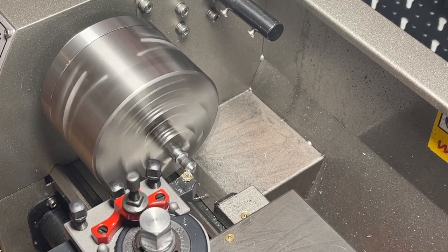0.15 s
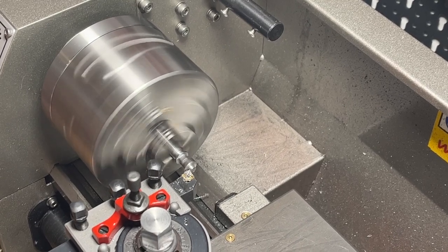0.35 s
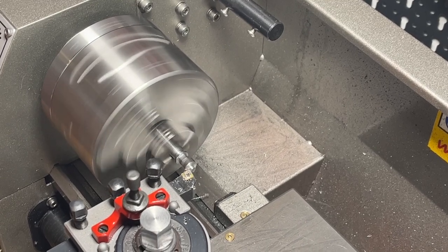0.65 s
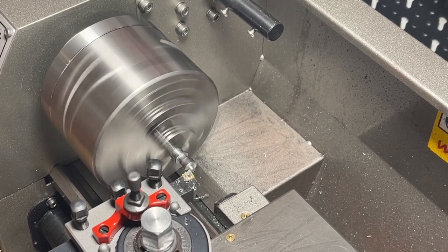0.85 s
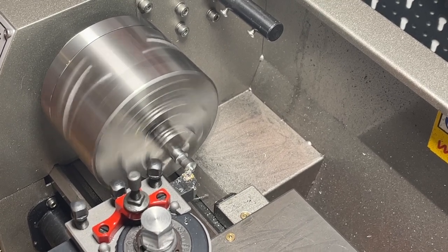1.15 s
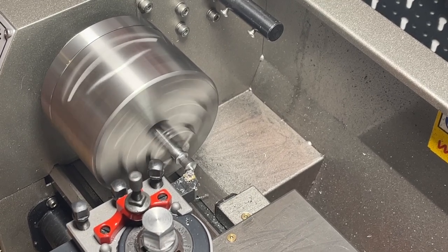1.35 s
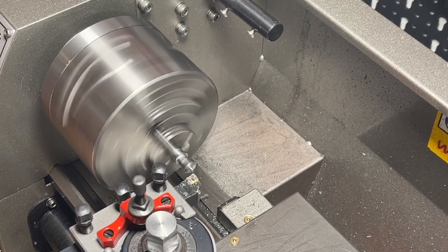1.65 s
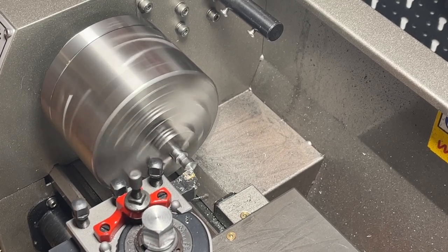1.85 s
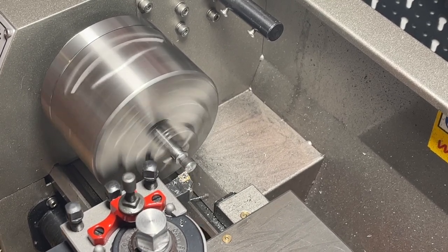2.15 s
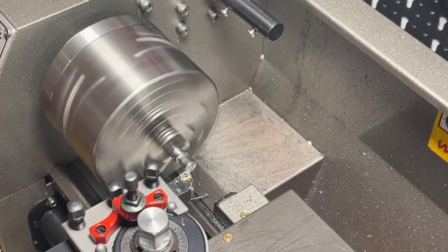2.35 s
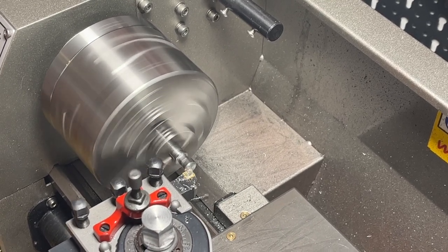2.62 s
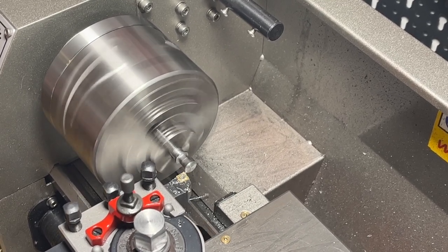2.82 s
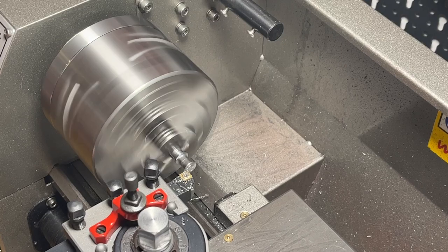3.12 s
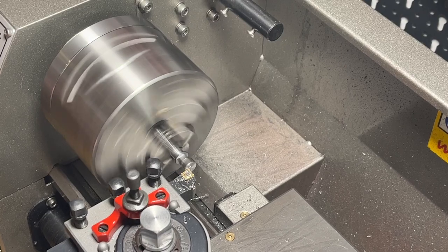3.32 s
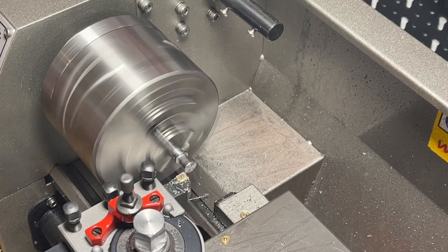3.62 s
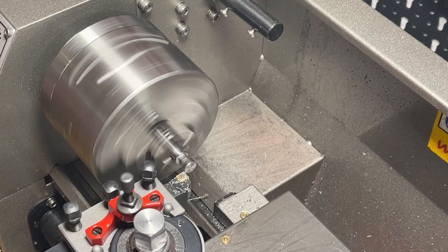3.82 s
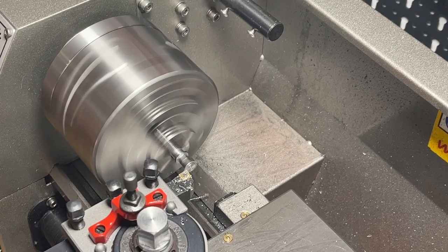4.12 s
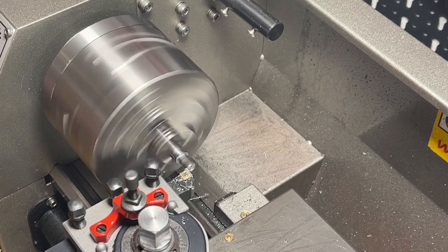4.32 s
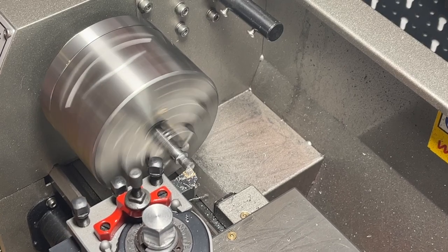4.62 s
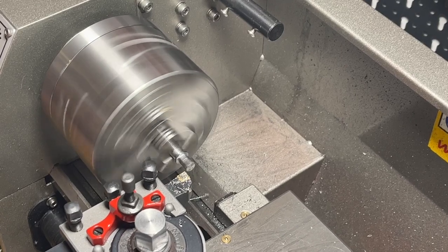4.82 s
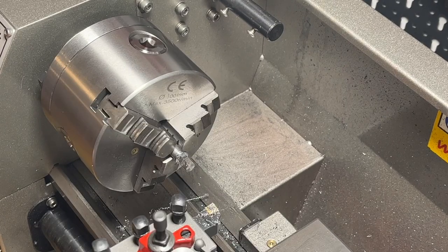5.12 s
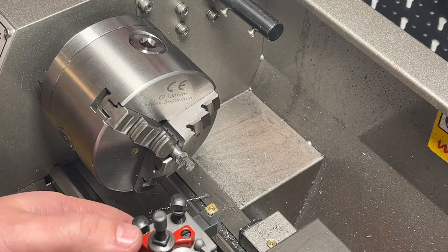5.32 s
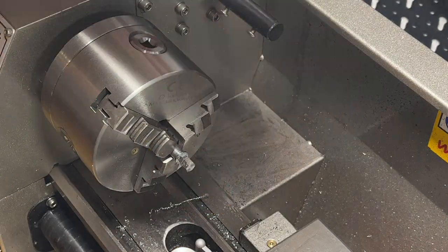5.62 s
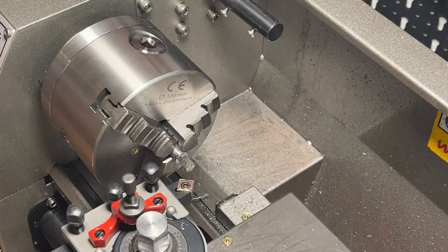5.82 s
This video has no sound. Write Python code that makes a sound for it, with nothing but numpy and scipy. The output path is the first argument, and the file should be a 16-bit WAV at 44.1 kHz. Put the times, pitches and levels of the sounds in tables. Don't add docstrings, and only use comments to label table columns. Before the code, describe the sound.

A small metal lathe whirs steadily with rattling gears and ticking joins, stops abruptly near five seconds, then quiet bumps, rubs and one sharp knock.

```python
import sys
import numpy as np
from scipy import signal
from scipy.fft import rfft, irfft, next_fast_len
from scipy.io import wavfile
from scipy.ndimage import uniform_filter1d, map_coordinates

SR = 44100
rng = np.random.default_rng(int(sys.argv[2]) if len(sys.argv) > 2 else 0)


def voltage_ratio(level):
    return 10 ** (np.asarray(level, float) / 20)


def transcribe(u):
    v = np.clip(np.atleast_2d(u).T, -1, 1)
    q = np.round(v * 32767).astype(np.int16)
    wavfile.write(sys.argv[1], SR, q)


N = 262836

# freq_hz, density_db (per Hz)
RUSH_COLOUR = [(500, -62), (730, -23), (1100, -18.5), (1400, -7), (1600, -13.5), (2000, -9), (2600, -19.5),
               (4040, -28), (5660, -30), (7400, -41.5), (8350, -54), (9600, -41.5), (14300, -56.5),
               (15500, -74)]
# freq_hz, density_db (per Hz)
BENCH_COLOUR = [(12, -55.5), (32, -11.5), (45, -7), (65, -12), (90, -5), (156, 0), (220, -7), (290, -43.5),
                (480, -120)]
# freq_hz, density_db (per Hz)
HOUSING_COLOUR = [(120, -23), (200, -25), (248, -2), (361, -0.5), (393, -3), (433, 0.5), (471, -4),
                  (720, -18), (940, -54), (1580, -120)]
# centre_hz, width_hz, level_db
CASTING_MODES = [(984, 83, -14), (1262, 34, -9), (1307.4, 36.4, -0.5), (1428, 27, -17.5), (1474.3, 43, -3),
                 (1684, 40, -9), (1781, 23, -5), (2024, 150, -14), (2190, 37, -4.5), (2337, 100, -11.5),
                 (2535, 31, -17), (3100, 47, -15.5), (3296, 127, -16), (3730, 37, -20), (4797, 330, -26),
                 (5516, 250, -24.5), (6090, 140, -26)]
# time_s, pitch_hz, level_db (rms)
BRAKE_HUM = [
    (4.955, 418.4, -73),
    (4.975, 387, -31),
    (5.0, 373, -42),
    (5.008, 311, -33),
    (5.032, 310, -45),
    (5.04, 380, -49.5),
    (5.07, 368, -45),
    (5.082, 362, -75),
]
# time_s, pitch_hz, level_db (rms)
STEEL_RING = [
    (5.624, 5100, -95),
    (5.635, 5080, -82),
    (5.665, 5060, -89),
    (5.7, 5050, -90),
]
# time_s, pitch_hz, level_db (rms)
PALM_PUSH = [
    (5.575, 120, -70),
    (5.587, 106, -52),
    (5.594, 97, -41),
    (5.599, 90, -38),
    (5.6, 90, -84),
]
# pitch_hz, level_db (rms), slip_rad (phase
STEADY_TONES = [(2744, -48.5, 1.8), (1312, -48, 1.6), (171, -54, 1.0), (251, -54, 1.5), (440, -52.5, 1.6)]
# pitch_hz, level_db (rms), slip_rad
DRIVE_WHINE = [(7698, -74, 1.4), (8027, -88, 1.2), (8613, -88, .8), (8780, -77, .35), (8952, -75.5, .6),
               (9120, -76, .8), (9265, -73.5, 1.0), (9288, -78, .8), (9437, -77, .9), (9528, -73.5, 1.1),
               (9690, -69, 1.5), (10026, -68, 1.5)]
# pitch_hz, level_db (rms), slip_rad
IDLE_WHINE = [(10026, -110, .3)]
# start_s, thud_db, thud_hz, rub_db
HANDLING = [(5.035, -44, 287, -56), (5.047, -55, 325, -63.5), (5.08, -76, 66, -91), (5.18, -60.5, 104, -84),
            (5.215, -76, 300, -80), (5.251, -66, 199, -74), (5.275, -76, 92, -85),
            (5.322, -51.5, 263, -50.5), (5.359, -58, 197, -75), (5.395, -57, 109, -68),
            (5.419, -63, 128, -82), (5.443, -82, 203, -89), (5.455, -44, 125, -51), (5.491, -51, 121, -58),
            (5.506, -49, 218, -44.5), (5.514, -56, 112, -77), (5.539, -78, 234, -89),
            (5.567, -48.5, 111, -84), (5.601, -62, 179, -90), (5.623, -62, 87, -75), (5.66, -68, 180, -87),
            (5.697, -60, 401, -75), (5.721, -47, 352, -48), (5.75, -52, 209, -99), (5.76, -57, 144, -60.5),
            (5.794, -55, 51, -78), (5.817, -50, 104, -76), (5.828, -66, 147, -73.5),
            (5.865, -75.5, 260, -86), (5.925, -66, 120, -82.5)]
# freq_hz, density_db (per Hz)
DEEP_COLOUR = [(25, -27), (55, -4), (100, 2), (160, -8), (300, -30.5), (900, -56)]
# freq_hz, density_db (per Hz)
HOLLOW_COLOUR = [(90, -25), (200, 0.5), (370, -1), (650, -14.5), (1200, -26)]
# freq_hz, density_db (per Hz)
RUB_COLOUR = [(400, -24), (700, -2.5), (1150, -6), (1450, 1), (1750, -2.5), (2000, -4), (2650, -10),
              (3080, -5.5), (3400, -13), (4100, -11.5), (7000, -25), (8400, -49), (9500, -73.5)]
# freq_hz, density_db (per Hz)
HISS_COLOUR = [(1200, -26), (2500, -6.5), (6500, -11.5), (8400, -28), (9600, -12), (14500, -16),
               (15500, -43)]
# start_s, peak_db, cut_s (the editor cuts it off)
POST_KNOCK = (5.7352, -16.5, 5.7517)
# pitch_hz, level_db, t60_s
POST_MODES = [(381, -14.5, .2), (564, -14.5, 0.12), (924, -13, 0.093), (1294, -19, .1), (1920, 0.5, 0.029),
              (2820, -10, 0.04), (3470, 6.5, 0.015), (4400, -2.5, 0.018), (4500, -8.5, .04),
              (5330, -2, 0.02), (6850, -19, 0.063), (10300, -11.5, 0.031), (12140, -20.5, .02)]
# freq_hz, density_db (per Hz)
AIR_COLOUR = [(40, -12), (90, 0), (200, -14), (400, -13), (700, -14.5), (2000, -30), (6000, -53.5)]
# time_s, level_db
CUT_DEPTH = [(0, -67), (0.44, -69.5), (0.5, -56), (0.57, -74), (0.72, -62), (0.76, -65), (1.0, -66.5),
             (1.96, -66), (2.33, -66), (2.5, -68), (3.11, -62.5), (3.35, -67), (3.71, -66.5), (3.86, -60),
             (3.9, -77), (3.97, -63), (4.2, -61.5), (4.5, -66.5)]
# time_s, half_length_s, change_db
HAND_LEANS = [(0.05, 0.019, -9), (0.17, .07, 5.5), (0.28, 0.012, -16.5), (0.36, 0.18, 4.5),
              (0.7, 0.063, 6.5), (0.755, .025, -7), (0.9, 0.081, 5.5), (2.1, 0.058, 3), (2.46, 0.02, 6),
              (3.17, 0.13, 3), (3.33, .06, 2.5), (3.71, 0.069, -3.5), (4.15, 0.087, 8.5), (4.28, 0.027, 8),
              (4.86, 0.13, 2.5)]
# time_s, change_db
MESH_BEATS = [(0.0, -4), (0.08, -1), (0.15, -2), (0.23, 6), (0.29, -9.5), (0.33, 4), (0.87, -1),
              (0.92, 0.5), (0.98, -11), (1.19, -3), (1.25, -2), (1.35, -6), (0.7, 3), (1.71, -2),
              (2.05, 0.5), (2.1, 6), (2.29, -20), (3.04, -10), (3.14, 6), (3.26, -7), (3.69, -11),
              (4.17, -8), (4.3, 1), (4.37, -11), (4.53, -10), (4.62, -3), (4.67, 3), (4.81, -7), (4.86, -1),
              (4.9, -5)]
# time_s, peak_db
RUNNING_JOINS = [(0.1419, -46), (0.166, -48), (0.3828, -45), (0.4791, -47), (0.5273, -47), (0.7556, -46),
                 (0.852, -48), (0.8885, -47), (0.9483, -46), (1.3105, -42), (1.6834, -47), (1.744, -46),
                 (1.9242, -46), (2.0572, -45), (2.3814, -48), (2.4666, -47), (2.5273, -45), (2.7644, -46),
                 (2.8404, -48), (2.8885, -47), (3.2142, -47), (3.8279, -47), (3.8644, -48), (3.9126, -46),
                 (4.009, -47), (4.0456, -45), (4.1178, -48), (4.2499, -45), (4.4675, -48), (4.9724, -47)]
# time_s, peak_db
HANDLING_JOINS = [(4.9858, -50), (5.0331, -69), (5.0456, -70), (5.0812, -82), (5.2142, -83), (5.3221, -76),
                  (5.4184, -82), (5.4907, -60), (5.5032, -64), (5.5387, -85), (5.5872, -90), (5.5995, -69),
                  (5.6237, -83), (5.6959, -84), (5.72, -68), (5.7797, -76), (5.7921, -82), (5.8163, -78),
                  (5.8279, -76)]
# start_s, end_s, level_db
SLEEVE_BRUSHES = [
    (5.226, 5.246, -69),
    (5.233, 5.24, -65),
    (5.249, 5.263, -66),
    (5.243, 5.276, -70),
    (5.272, 5.273, -65),
    (5.277, 5.32, -80),
    (5.828, 5.865, -80),
]
# freq_hz, density_db (per Hz)
SPRAY_COLOUR = [(9000, -27), (10500, 2.0), (12500, -7.5), (14300, -18), (15300, -47)]

BENCH_DB, HOUSING_DB, GEAR_DB, MESH_DB = -48.5, -40.5, -33.66, -39.5
HOUSING_SHARE, GEAR_SHARE = 0.46, 0.12
STOP_S, MACHINE_END_S, SPIN_DOWN_DB_PER_S = 4.97, 5.035, 168
LOW_SHARE, EDGE_SHARE = 0.71, 1.6
PAIR_S, LONG_AT_S, SHORT_AT_S = 0.024096, 0.009, 0.02127
CUT_SHARE, STEP_DB, STEP_TOP_DB = 0.5, -56, -50.5
HISS_DB, HISS_GROWS = -87, 0.58


def unit(x):
    return x / np.sqrt(np.mean(x ** 2) + 1e-20)


def along(points, hz):
    f, v = np.transpose(points)
    return np.interp(np.log(hz + 1), np.log(f + 1), v, left=-120, right=-120)


def wobble(rate_hz):
    return map_coordinates(rng.standard_normal(int(N * rate_hz / SR) + 4), [np.arange(N) * rate_hz / SR])


def coloured(x, gain):
    m = next_fast_len(N + 8192)
    return unit(irfft(rfft(x, m) * gain(np.fft.rfftfreq(m, 1 / SR)), m)[:N])


def noise(colour):
    return coloured(rng.standard_normal(N), lambda hz: voltage_ratio(along(colour, hz)))


def even(x):
    return unit(x / np.sqrt(np.abs(uniform_filter1d(x ** 2, size=1400)) + 0.36))


def bumps(rows):
    t = np.arange(N) / SR
    return sum(db * np.exp(-((t - s) / half) ** 2) for s, half, db in rows)


def glide(rows):
    s, hz, db = np.transpose(rows)
    t = np.arange(N) / SR
    phase = 2 * np.pi * np.cumsum(np.interp(t, s, hz)) / SR
    return np.sqrt(2) * voltage_ratio(np.interp(t, s, db, left=-150, right=-150)) * np.sin(phase)


def tones(lines, sway_db, rows):
    hz, db, slip = np.transpose(lines)[:, :, None]
    t = np.arange(N) / SR
    slips = rng.standard_normal((len(rows) + 1, len(lines))).T
    turned = np.exp(1j * slip * np.cumsum(slips, axis=1))
    piece = np.searchsorted(np.sort(rows[:, 0]), t)
    faded = uniform_filter1d(turned[:, piece], size=400, axis=1)
    sway = voltage_ratio(db + sway_db * np.array([wobble(20) for _ in lines]))
    waves = np.abs(faded) * np.cos(2 * np.pi * hz * t + np.angle(faded))
    return np.sqrt(2) * np.sum(sway * waves, axis=0)


def shop_air():
    return voltage_ratio(-74.5) * noise(AIR_COLOUR)


def editor_cuts():
    listed = np.array(RUNNING_JOINS + HANDLING_JOINS)
    s = (np.arange(0, 4.94, PAIR_S)[:, None] + [LONG_AT_S, SHORT_AT_S]).ravel()
    pick, step = rng.random(len(s)), np.abs(rng.standard_normal(len(s)))
    free = np.abs(s[:, None] - listed[:, 0]).min(axis=1) > 0.003
    db = np.minimum(STEP_DB + 20 * np.log10(step + 0.3), STEP_TOP_DB)
    return np.vstack([np.c_[s, db][free & (pick < CUT_SHARE)], listed])


def join_ticks(rows):
    s, db = np.transpose(rows)
    steps = np.zeros(N)
    steps[(s * SR).astype(int)] = voltage_ratio(db + 24) * np.sign(rng.standard_normal(len(s)))
    t = np.arange(-800, 801) / SR
    lean = 0.3 * np.exp(-np.abs(t) / 0.00015) + 0.1 * np.exp(-np.abs(t) / 0.0008)
    busy = np.sign(t + 1e-9) * lean
    settle = (t >= 0) * np.exp(-np.abs(t) / 0.0014)
    running = np.arange(N) < MACHINE_END_S * SR
    ticks = signal.fftconvolve(steps * running, busy, "same")
    return ticks + signal.fftconvolve(steps * ~running, settle, "same")


def held_level(db, size):
    which = np.searchsorted(np.transpose(HANDLING)[0], np.arange(N) / SR) - 1
    return uniform_filter1d(voltage_ratio(db)[which] * (which >= 0), size)


def thuds():
    _, thud_db, thud_hz, _ = np.transpose(HANDLING)
    hollow = np.clip(np.log(thud_hz / 95) / np.log(3.4), 0.03, 0.99)
    deep = held_level(thud_db + 10 * np.log10(1 - hollow), 120) * even(noise(DEEP_COLOUR))
    return deep + held_level(thud_db + 10 * np.log10(hollow), 120) * even(noise(HOLLOW_COLOUR))


def slide_rubs():
    rub_db = np.transpose(HANDLING)[3]
    t = np.arange(N) / SR
    grit = voltage_ratio(3 * wobble(400))
    rub = held_level(rub_db, 20) * unit(grit * noise(RUB_COLOUR))
    brush = sum(voltage_ratio(db) * (t > start) * (t < end) for start, end, db in SLEEVE_BRUSHES)
    hiss = held_level(HISS_DB + HISS_GROWS * (rub_db + 70.5), 20) + brush * voltage_ratio(2.5 * wobble(90))
    return rub + hiss * noise(HISS_COLOUR)


def handling():
    return thuds() + slide_rubs() + glide(PALM_PUSH) + wobble(500) * glide(STEEL_RING)


def knock():
    start, db, cut = POST_KNOCK
    t = np.clip(np.arange(N) / SR - start, 0, None)
    ring = sum(voltage_ratio(level - 60 * t / t60) * np.sin(2 * np.pi * hz * t) for hz, level, t60 in POST_MODES)
    chatter = 0.53 * voltage_ratio(-60 * t / 0.032) * noise(HISS_COLOUR)
    chatter = chatter + 0.32 * voltage_ratio(-60 * t / 0.1) * noise(RUB_COLOUR)
    onset, cutoff = 1 - np.exp(-t / 0.0006), np.clip((cut - start - t) / 0.001, 0, 1)
    return voltage_ratio(db - 6) * (ring + chatter) * onset * cutoff


def bench_and_housing():
    lean_db = bumps(HAND_LEANS)
    bench = voltage_ratio(BENCH_DB + lean_db + 0.88 * wobble(9)) * noise(BENCH_COLOUR)
    housing_db = HOUSING_DB + HOUSING_SHARE * lean_db + 1.75 * wobble(12)
    return bench + voltage_ratio(housing_db) * even(noise(HOUSING_COLOUR))


def cutter(level_db):
    bites = rng.standard_normal(N) * voltage_ratio(5.1 * wobble(120))
    chirp = coloured(bites, lambda f: 1 / (1 + ((f - 10700) / 130) ** 2))
    heavy = voltage_ratio(2.2 * (uniform_filter1d(level_db, size=5000) + 62) - 63)
    return voltage_ratio(level_db - 4) * chirp + heavy * noise(SPRAY_COLOUR)


def mesh_and_whine(rows):
    held = tones(STEADY_TONES, 1.6, rows) + tones(DRIVE_WHINE, 1.0, rows)
    beat_db = bumps([(s, 0.02, db) for s, db in MESH_BEATS])
    dips_db = 5 * np.clip(wobble(34) - 0.3, 0, 3)
    return held + voltage_ratio(MESH_DB - dips_db + beat_db) * tones([(915, 1.0, 1.9)], 1.0, rows)


def gears():
    turn = 0.75 * wobble(32)
    contacts = rng.standard_normal(N) * voltage_ratio(3.2 * wobble(400) + turn)
    rattle = rng.standard_normal(N) * voltage_ratio(1.4 * wobble(300) + turn)

    def ring(f):
        return sum(voltage_ratio(db) * (1j * f * w / (c * c - f * f + 1j * f * w)) ** 2 for c, w, db in CASTING_MODES)

    def rush(f):
        notch_db = -14 * np.exp(-((f - 8330) / 240) ** 2)
        return voltage_ratio(along(RUSH_COLOUR, f) + notch_db)

    return voltage_ratio(-2.5) * coloured(rattle, rush) + voltage_ratio(-3.5) * coloured(contacts, ring)


def lathe(rows):
    t = np.arange(N) / SR
    cut_db = np.interp(t, *np.transpose(CUT_DEPTH))
    fall_db = SPIN_DOWN_DB_PER_S * np.clip(t - STOP_S, 0, 1)
    gear_db = GEAR_DB + GEAR_SHARE * (cut_db - cut_db.mean()) - fall_db
    running = voltage_ratio(-LOW_SHARE * fall_db) * bench_and_housing()
    running = running + voltage_ratio(gear_db) * gears()
    running = running + voltage_ratio(np.minimum(5 - 2.2 * fall_db, 0)) * mesh_and_whine(rows)
    running = running + cutter(cut_db - EDGE_SHARE * fall_db)
    return running * (t < MACHINE_END_S) + tones(IDLE_WHINE, 3, rows) + glide(BRAKE_HUM)


def scene():
    rows = editor_cuts()
    return (shop_air() + join_ticks(rows) + handling() + knock() + lathe(rows))[None]


def top_cut(x):
    return signal.sosfilt(signal.butter(12, 16610, fs=SR, output="sos"), x)


def record(dry):
    m = next_fast_len(N + SR)
    edge = np.clip((15870 - np.fft.rfftfreq(m, 1 / SR)) / 120, 0, 1)
    mix = irfft(rfft(dry, m) * edge, m)[:, :N]
    return top_cut(mix)


dry = scene()
out = record(dry)
transcribe(out)
```